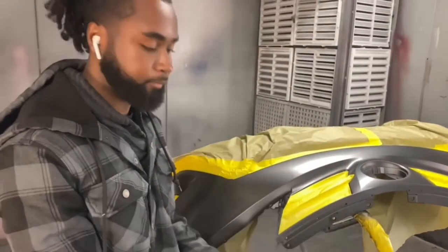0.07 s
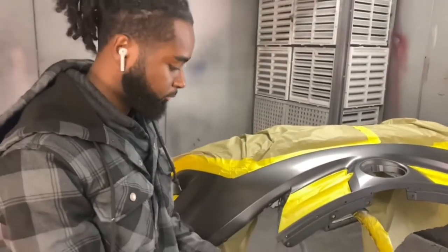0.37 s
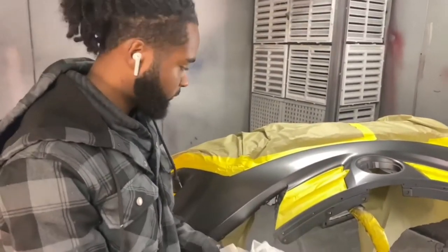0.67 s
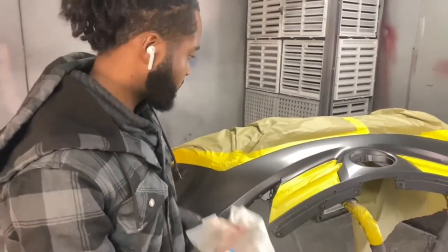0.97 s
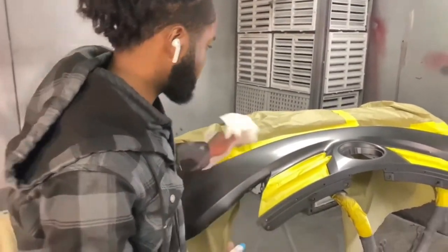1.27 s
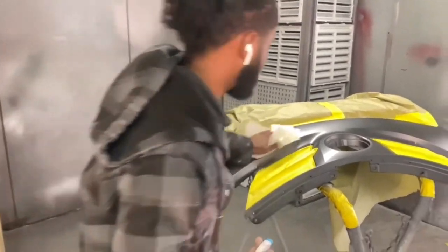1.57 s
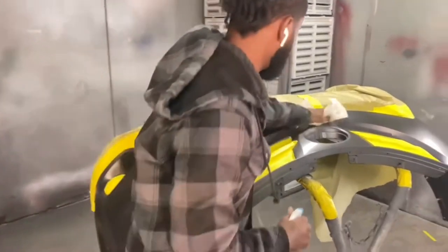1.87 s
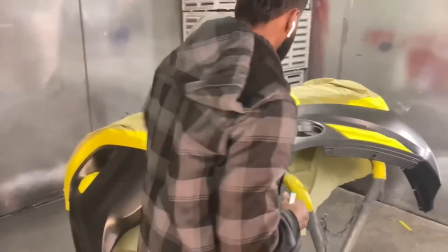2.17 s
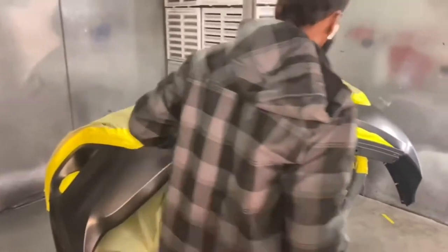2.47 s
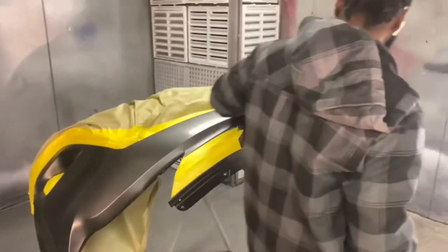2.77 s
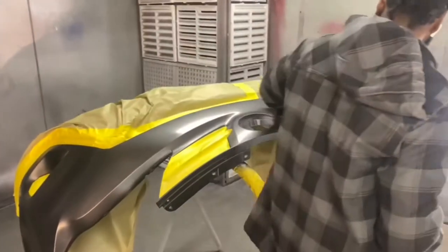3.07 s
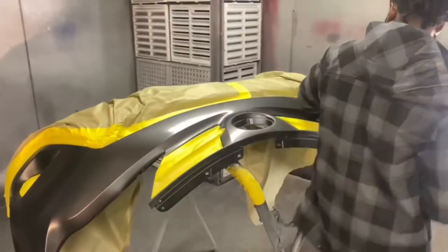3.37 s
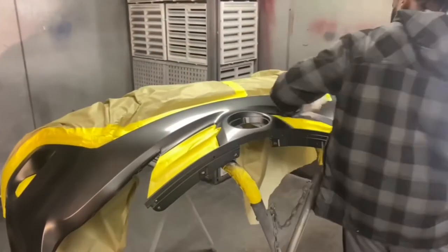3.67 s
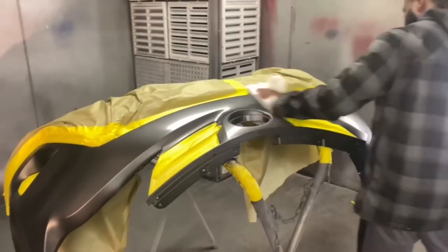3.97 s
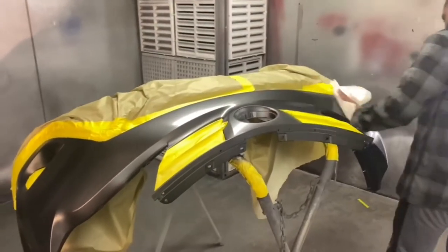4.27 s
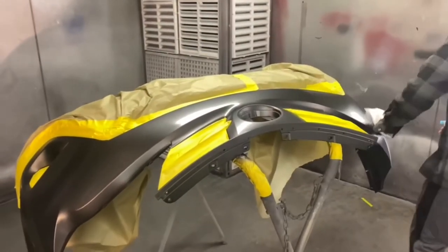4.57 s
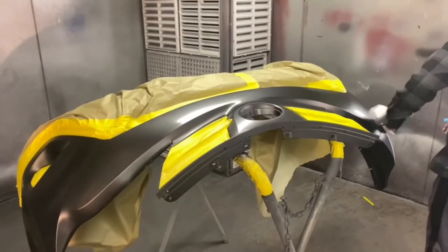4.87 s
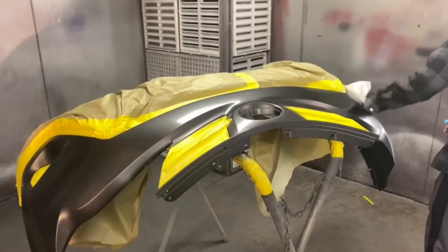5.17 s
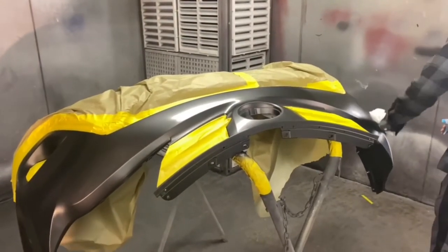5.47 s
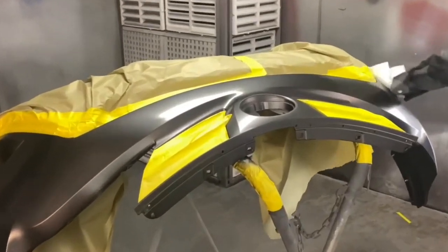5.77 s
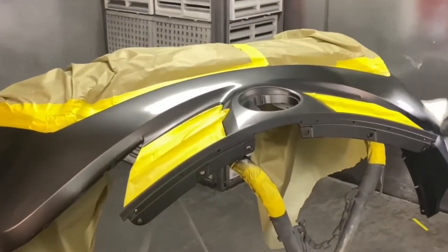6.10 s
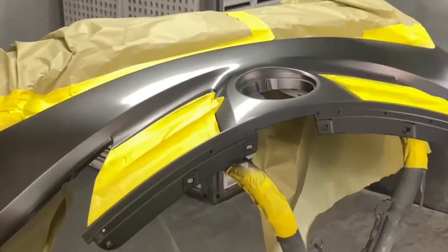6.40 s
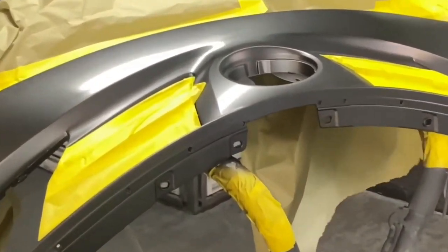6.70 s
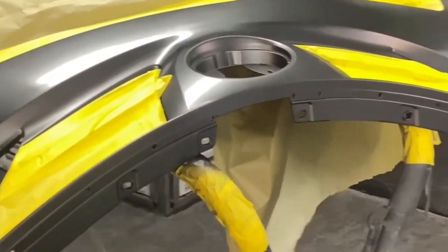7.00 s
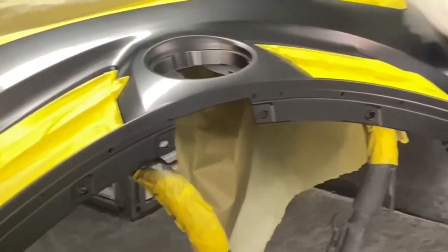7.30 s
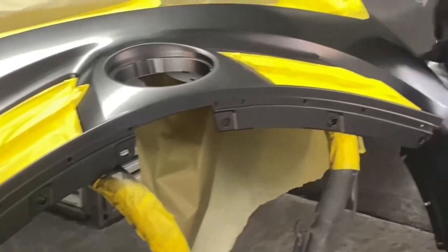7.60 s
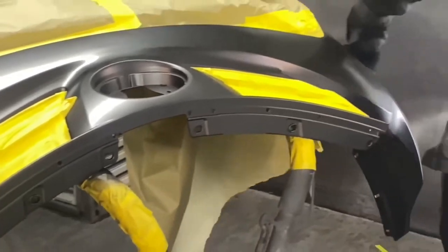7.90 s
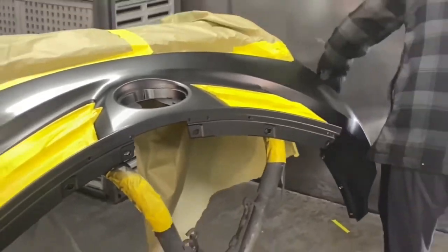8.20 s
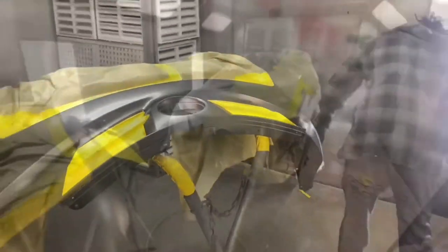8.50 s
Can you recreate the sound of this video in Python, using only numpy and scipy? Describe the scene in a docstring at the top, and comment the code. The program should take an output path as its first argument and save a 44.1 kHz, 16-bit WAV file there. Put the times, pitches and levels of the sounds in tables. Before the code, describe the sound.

Inside a workshop paint booth, a deep, quickly pulsing fan hum runs without a break, joined by low duct turbulence and an airy filter hiss with a faint whistle on the left. The tone shifts slightly as the microphone moves. Past the middle, the stereo image tightens and the rushing air becomes stronger and brighter, then settles back and fades a little at the end.

```python
"""A deep motor hum, throbbing five times a second, fills a sheet-metal paint booth: the ventilation fan.
With it come the rumble of turbulence in the ducts and the hiss of air through the filters.
Heard from inside, on the microphone pair of a hand-held camera that leaves its first spot by the
filters, draws near the work and backs away. As the camera zooms in and out again, the pair narrows
from wide stereo to a forward beam and back."""
import sys
import numpy as np
from scipy import signal
from scipy.fft import rfft, irfft
from scipy.io import wavfile
from scipy.ndimage import uniform_filter1d

SR = 44100
rng = np.random.default_rng(int(sys.argv[2]) if len(sys.argv) > 2 else 0)


def transcribe(signal):
    """Save signal, clipped to [-1, 1], as a 16-bit WAV file at the path in sys.argv[1]."""
    frames = np.atleast_2d(signal).T
    limited = np.clip(frames, -1, 1)
    pcm = np.round(limited * 32767).astype(np.int16)
    wavfile.write(sys.argv[1], SR, pcm)


N = 377010
TIME = np.arange(N) / SR
BINS = np.maximum(np.arange(N // 2 + 1) * SR / N, 1)   # Hz

# Left-right likeness in the beam.
# Each row: frequency in Hz, likeness from 0 to 1, lead of the left in radians.
BEAM_LIKENESS = [(30, .97, .3), (300, .88, .5), (380, .7, .1), (520, .8, 1.8), (650, .6, -.5), (830, .8, 0),
                 (1500, .2, -1.8), (2200, 1, 0), (7400, 1, 0), (7800, .5, -1.7), (8400, 1, 3.1),
                 (8700, 1, 3.1), (9250, .6, 1)]
# At full zoom the microphone turns up the rush and the hiss of the air.
ZOOM_BOOST = dict(start_s=5.88, attack_s=.18, end_s=7.92, release_s=.25)


def from_db(db):
    """Decibels to gain."""
    return 10 ** (np.asarray(db) / 20)


def in_time(rows):
    """A curve through rows of seconds and value, joined by straight lines."""
    return np.interp(TIME, *np.transpose(rows))


def over_bins(rows):
    """Each column of a table, joined on a log-frequency axis."""
    hz, *columns = np.transpose(rows)
    return np.array([np.interp(np.log(BINS), np.log(hz.real), column) for column in columns])


def ramp(start_s, takes_s):
    """An even move from 0 to 1."""
    return np.clip((TIME - start_s) / takes_s, 0, 1)


def there_and_back(start_s, attack_s, end_s, release_s):
    """Rise from 0 to 1, hold until end_s, then fall back."""
    return ramp(start_s, attack_s) * (1 - ramp(end_s, release_s))


def white(count):
    """Spectra of unrelated noises with a power of 1 per Hz."""
    return rfft(rng.standard_normal((count, N))) * np.sqrt(SR / 2)


def drift(rate_hz):
    """A random wander with a spread of 1, mostly slower than rate_hz."""
    slow = irfft(white(count=1)[0] / (1 + (BINS / rate_hz) ** 2), N)
    return (slow - slow.mean()) / slow.std()


def below(sound, hz):
    """The part of a sound under a frequency."""
    return irfft(rfft(sound) / (1 + (BINS / hz) ** 8), N)


def lift(sound, low_hz, high_hz, db):
    """One band of a sound rises and falls along a level curve."""
    return sound + (below(sound, high_hz) - below(sound, low_hz)) * (from_db(db) - 1)


def stereo_noise(gain, likeness):
    """Noise with a given spectrum on each side, and a given likeness and lead between the sides."""
    # The top octave, wide or beam. Each row: frequency in Hz, likeness 0 to 1, left lead in radians.
    top_likeness = [(9700, 1, 0), (10400, 1, 0), (11050, .55, -1.4), (11800, 1, 3.1), (12300, 1, 3.1),
                    (12950, .5, 1.7), (13300, 1, 0), (14400, 1, 0), (15000, .4, -1.3), (15300, 1, 3.1)]
    rows = [(hz, share * np.exp(1j * lead)) for hz, share, lead in likeness + top_likeness]
    alike = over_bins(rows)[0]
    right, unrelated = white(count=2)
    left = alike * right + np.sqrt(np.maximum(1 - abs(alike) ** 2, 0)) * unrelated
    return irfft(gain * [left, right], N)


def through_zoom(wide_gain, beam_gain, zoom):
    """Diffuse noise as the microphone blends its wide pattern into the beam."""
    # Left-right likeness in wide stereo; the hiss sounds hollow in the centre around 1.3-2 kHz.
    # Each row: frequency in Hz, likeness 0 to 1, left lead in radians.
    wide_likeness = [(30, .97, .2), (130, .98, .3), (240, .72, .5), (320, .72, .55), (390, .5, .3),
                     (520, .9, -2.9), (650, .6, -2.7), (850, .1, -1.8), (1300, .52, -2.9),
                     (1700, .76, -3.0), (2050, .48, -3.0), (2500, .05, 0), (7400, .1, -1), (8400, .6, 2.4),
                     (9200, .5, 1.2)]
    wide = stereo_noise(wide_gain, wide_likeness)
    beam = stereo_noise(beam_gain, BEAM_LIKENESS)
    return np.sqrt(1 - zoom) * wide + np.sqrt(zoom) * beam


def rotor_slip(first_throb_s=.147):
    """The rotor falls behind the magnetic field: one turn of this pointer is one throb."""
    # The pace of the slip. Each row: time in seconds, throbs per second.
    slip_rate = [(0, 5.107), (4.8, 5.107), (5.4, 5.17), (8.55, 5.17)]
    turns = np.cumsum(in_time(slip_rate)) / SR
    return np.exp(2j * np.pi * (turns - np.interp(first_throb_s, TIME, turns)))


def motor_hum(zoom, first_spot, near, hum_hz=100.15, upper_tone_db=-11):
    """Multiples of the magnetic hum throb as slip adds a tone just below each and a weaker one above."""
    # The partials, lowest first. Each row: base level in dB for wide left, wide right, beam left and
    # beam right, change in dB at the first spot and near the work, waver as a share of the amplitude.
    partials = [(-32.5, -27.5, -30.5, -28.5, 0, 0, 0.18), (-15.5, -12, -15.5, -15.5, 0.13, 1.8, 0.03),
                (-42.5, -45.5, -43.5, -44.5, 7.5, 7, 0.17), (-49, -48.5, -53, -53, 1, 1, 0.44),
                (-38, -41.5, -41, -51, -2.3, 1, 0.19), (-45.3, -60, -50.5, -55, -5.5, 1, 0.17),
                (-55.5, -63.5, -60, -67, 2.5, -2, 0.4), (-53, -59, -51.5, -54.5, -13, 0.5, 0.21),
                (-62, -60, -70, -65, -4, 5, 0.4)]
    # The throb of each partial. Each row: lower side tone in dB, lead in the throb's cycle in radians.
    throbs = [(-24, -2), (-19, 0), (-5, .4), (-12, 1.6), (-6.5, 2.7), (-10, 1.6), (-10, 3), (-9, -2.6),
              (-10, -2)]
    # Standing waves put the ports out of step. Each row: a partial's left lead in radians, wide and beam.
    port_leads = [(.5, .4), (.4, .6), (-.4, -.2), (2.7, 2.1), (3.4, 1.9), (-2.1, -1.1), (3.5, 1.6),
                  (.7, .1), (1.5, .6)]
    # The lowest partial sways and once nearly drops out. Each row: time in seconds, change in dB.
    lowest_sway = [(0, -.5), (.7, 0), (.88, -4.5), (1.03, 1), (2, -1.2), (2.85, -.5), (3.05, 3.5),
                   (3.3, 0.5), (3.65, 1.5), (4.1, 1), (4.3, -3), (4.9, .3), (5.4, -0.5), (6.06, 0),
                   (6.17, -11), (6.27, 1.5), (6.7, 3.5), (7.6, 3), (8.55, -1)]
    # The microphone crosses the strongest partial's standing wave. Each row: seconds, change in dB.
    strongest_sway = [(0, -.2), (.7, 0.4), (1.05, 0), (1.35, -0.2), (1.95, 0.9), (2.3, -0.6), (2.7, 0),
                      (3.1, .5), (3.55, .5), (3.95, -.4), (4.4, -0.2), (4.9, .2), (5.4, -0.3), (8.55, 0)]
    sway_db = {1: in_time(lowest_sway), 2: in_time(strongest_sway)}
    phase = 2 * np.pi * np.cumsum(hum_hz + .045 * drift(rate_hz=.67)) / SR
    slip = rotor_slip()
    hum = np.zeros((2, N))
    for k, (partial, throb, leads) in enumerate(zip(partials, throbs, port_leads), 1):
        wide_left, wide_right, beam_left, beam_right, first_db, near_db, waver = partial
        throb_db, throb_lead = throb
        wide_lead, beam_lead = leads
        beat = slip * np.exp(1j * throb_lead)
        side_tones = beat.conj() - from_db(upper_tone_db) * beat   # part level, part pitch flutter
        air_load = drift(rate_hz=3) + 1j * drift(rate_hz=3)   # uneven load shakes level and phase
        swell = 1 + from_db(throb_db) * side_tones + waver * air_load
        # the level follows the microphone's place in the standing waves
        level = from_db(first_db * first_spot + near_db * near + sway_db.get(k, 0))
        tone = np.sqrt(2) * level * swell * np.exp(1j * (k * phase + 2 * np.pi * rng.random()))
        lead = np.exp(1j * (wide_lead + zoom * (beam_lead - wide_lead)))
        hum[0] += from_db(wide_left + zoom * (beam_left - wide_left)) * (tone * lead).real
        hum[1] += from_db(wide_right + zoom * (beam_right - wide_right)) * tone.real
    return hum


def resonance(hz, width_hz, db):
    """Gain of one resonance along the spectrum."""
    return from_db(db) / (1 + 2 * ((BINS - hz) / width_hz) ** 2)


def wall_ripple(depth_db, width_bins):
    """Reflections from the metal walls leave small peaks and dips along the spectrum."""
    ripple = uniform_filter1d(rng.standard_normal(len(BINS)), width_bins)
    ripple = uniform_filter1d(ripple, width_bins)
    return from_db(depth_db * ripple / ripple.std())


def duct_rumble(zoom, first_spot, near, mode_pan_db=.5, surge_db=1.1):
    """Turbulence from the fan excites the resonances of the ducts and the booth."""
    # The broad rumble. Each row: frequency in Hz, left and right base level in dB per Hz.
    turbulence = [(20, -79, -77), (32.5, -74, -76), (48, -63, -59.5), (71, -58, -56), (120, -60.5, -60),
                  (150, -62.5, -61), (218, -61.5, -63), (265, -65, -63), (335, -64.3, -62.5),
                  (408, -65, -64.5), (483, -65, -69.5), (550, -66.5, -72.5), (640, -68, -74.5),
                  (777, -69.5, -78.5), (1015, -78.5, -78.5), (1350, -83, -88), (2900, -105, -105)]
    # Duct and booth resonances. Each row: frequency in Hz, width in Hz, base level in dB per Hz.
    duct_modes = [(49, 6, -59.5), (84.2, 5.4, -46), (164.5, 4.1, -44), (174, 3, -51.5), (184.6, 4.7, -46),
                  (196.4, 7.6, -48), (216, 6, -56), (229, 8, -56), (255, 6.4, -54.5), (279, 5.4, -55.5),
                  (291, 6.9, -51), (368, 8, -63.5)]
    mode_power = sum(resonance(*mode) ** 2 for mode in duct_modes)
    mode_pan = from_db([[mode_pan_db], [-mode_pan_db]])
    power = from_db(over_bins(turbulence)) ** 2 + mode_power * mode_pan ** 2
    gain = np.sqrt(power) * wall_ripple(depth_db=1, width_bins=60)
    rumble = through_zoom(gain, gain * from_db(-.4), zoom)
    # the boom just under the strongest partial thins in the beam and close to the work
    boom_db = (1 - zoom) - 3.5 * zoom - 2 * near
    rumble = lift(rumble, low_hz=150, high_hz=195, db=boom_db)
    bass, under_rush = below(rumble, hz=115), below(rumble, hz=450)
    # on the way in the microphone passes through a swell of the bass
    bass_swell = there_and_back(start_s=5.65, attack_s=.5, end_s=6.8, release_s=1.2)
    bass_db = -.3 + zoom + 4 * bass_swell
    rush_db = 3 * there_and_back(**ZOOM_BOOST) - 2 * zoom - .4 * first_spot
    rush_db += surge_db * rotor_slip().real   # the rush surges with each throb
    return bass * from_db(bass_db) + (under_rush - bass) + (rumble - under_rush) * from_db(rush_db)


def duct_drone(first_spot, near):
    """A duct resonance just above the third partial drones, louder at the first spot, and swells once."""
    swell = there_and_back(start_s=3.34, attack_s=.15, end_s=3.75, release_s=.15)
    level_db = 4.5 * first_spot + 7 * swell + .5 * near
    return from_db(level_db) * stereo_noise(resonance(hz=315, width_hz=8.8, db=-52.5), BEAM_LIKENESS)


def filter_hiss(zoom, first_spot, right_whistle_share=.2, beam_whistle_share=.25):
    """Air streams through the filter panels, whose slots whistle faintly on the left."""
    # The air in wide stereo. Each row: frequency in Hz, left and right base level in dB per Hz.
    wide_hiss = [(715, -74, -84), (1350, -78.5, -79.5), (2030, -79.5, -79), (4000, -74, -77.5),
                 (4420, -74, -79), (4870, -70.5, -78.5), (5540, -71.5, -80), (6100, -69.5, -79.5),
                 (7700, -71.5, -80), (8650, -68, -75), (9300, -72.5, -72), (12800, -74.5, -74),
                 (13400, -75.7, -75.7), (16100, -76.7, -76.7)]
    # The air in the beam. Each row: frequency in Hz, left and right base level in dB per Hz.
    beam_hiss = [(700, -87, -88), (1300, -86.5, -85.5), (1780, -79.5, -84.5), (2150, -84.5, -84.5),
                 (4280, -81.5, -81.5), (5700, -76.5, -76.5), (7420, -76, -76), (7950, -71, -71),
                 (9800, -71.5, -71.5), (12900, -73.5, -73.5), (13400, -75, -75), (14100, -74, -74),
                 (14900, -78, -79), (15700, -76, -75)]
    # The whistles of the slots. Each row: frequency in Hz, width in Hz, rise over the hiss in dB.
    slot_whistles = [(2530, 26, 5), (3420, 19, 4.5), (3930, 80, 3), (4870, 80, 1), (5180, 26, 7),
                     (6330, 150, 1), (10730, 210, 4), (12800, 120, 5)]
    whistles = from_db(sum(db / (1 + ((BINS - hz) / width) ** 2) for hz, width, db in slot_whistles))
    walls = wall_ripple(depth_db=.9, width_bins=110)
    # the right port and the beam point away from the slots and catch less of their whistle
    wide_whistles = np.array([whistles, whistles ** right_whistle_share])
    wide_gain = walls * wide_whistles * from_db(over_bins(wide_hiss))
    beam_gain = walls * whistles ** beam_whistle_share * from_db(over_bins(beam_hiss))
    air = through_zoom(wide_gain, beam_gain, zoom)
    sheen_db = .8 * drift(rate_hz=3.5) + 1.5 * first_spot   # the slots' sheen swells with the draught
    air = lift(air, low_hz=4750, high_hz=5280, db=sheen_db)
    # the first spot faces the filters and catches a peak in the sizzle
    air = lift(air, low_hz=9100, high_hz=11500, db=2.5 * first_spot)
    # the zoom turns up three ranges of the air, the top one more slowly
    soft, under_sizzle = below(air, hz=4700), below(air, hz=8300)
    hiss, sizzle = under_sizzle - soft, air - under_sizzle
    boost = there_and_back(**ZOOM_BOOST)
    sizzle_boost = there_and_back(start_s=5.94, attack_s=.33, end_s=8.08, release_s=.3)
    flutter_db = .41 * drift(rate_hz=8)
    soft_db = -.15 + .16 * zoom + 2.5 * boost + flutter_db
    hiss_db = -.3 - zoom + 4 * boost + flutter_db
    sizzle_db = .08 - .4 * zoom + 2.4 * sizzle_boost - .5 * first_spot
    return soft * from_db(soft_db) + hiss * from_db(hiss_db) + sizzle * from_db(sizzle_db)


def scene():
    """Hum, rumble, drone and hiss, all heard through the moving, zooming microphone."""
    # each runs from 0 to 1: standing at the first spot, narrowed to the beam, close to the work
    first_spot = 1 - ramp(start_s=1.5, takes_s=.97)
    zoom = there_and_back(start_s=5.33, attack_s=.26, end_s=8.08, release_s=.14)
    near = there_and_back(start_s=5.63, attack_s=2.16, end_s=8.07, release_s=.24)
    hum = motor_hum(zoom, first_spot, near)
    ducts = duct_rumble(zoom, first_spot, near) + duct_drone(first_spot, near)
    return hum + ducts + filter_hiss(zoom, first_spot)


def record(dry):
    """The sound starts to fade in its last moments, the ends are eased and the top is cut steeply."""
    fade_start_s, fade_db_per_s, ease_s, cutoff_hz = 8.27, 9.5, .003, 15600
    fade = from_db(-fade_db_per_s * np.maximum(TIME - fade_start_s, 0))
    ease = np.clip(np.minimum(TIME, TIME[-1] - TIME) / ease_s, 0, 1)
    lowpass = signal.ellip(12, .1, 80, cutoff_hz, fs=SR, output="sos")
    return signal.sosfilt(lowpass, dry * fade * ease)


dry = scene()
out = record(dry)
transcribe(out)
```